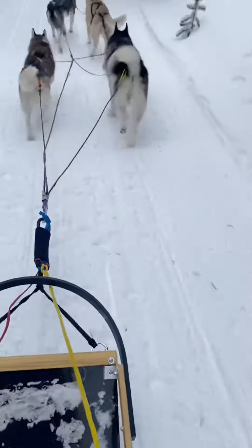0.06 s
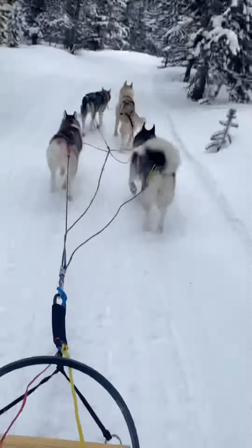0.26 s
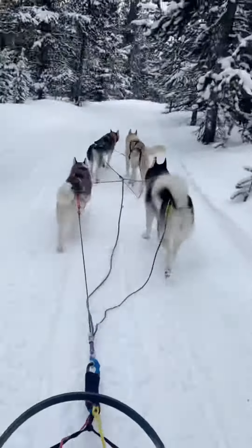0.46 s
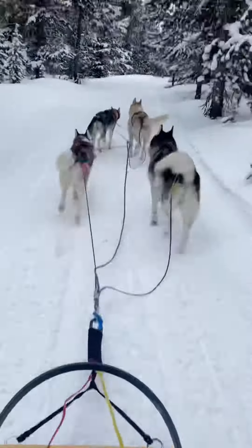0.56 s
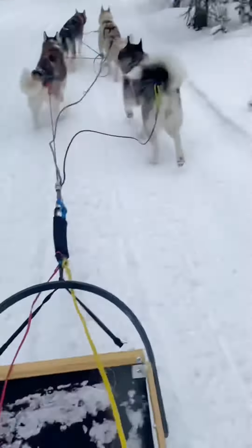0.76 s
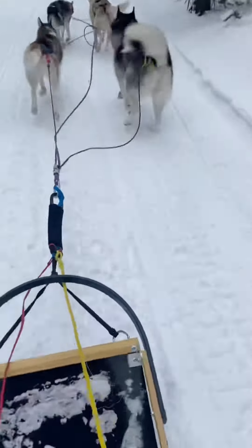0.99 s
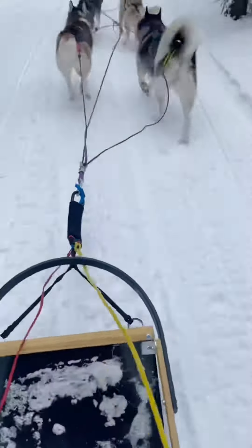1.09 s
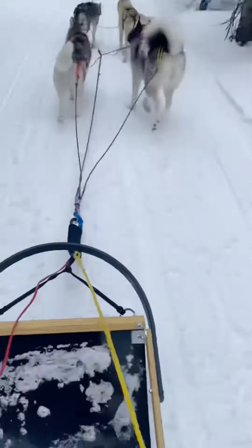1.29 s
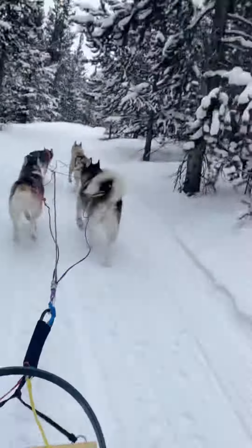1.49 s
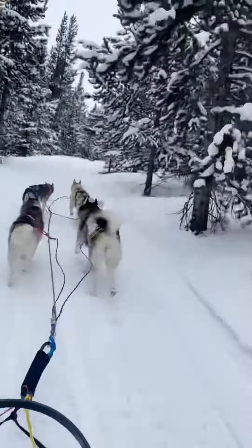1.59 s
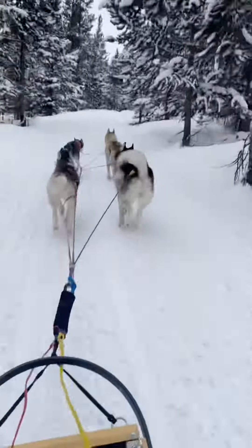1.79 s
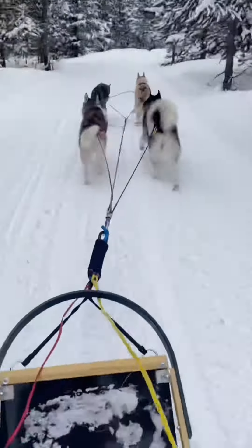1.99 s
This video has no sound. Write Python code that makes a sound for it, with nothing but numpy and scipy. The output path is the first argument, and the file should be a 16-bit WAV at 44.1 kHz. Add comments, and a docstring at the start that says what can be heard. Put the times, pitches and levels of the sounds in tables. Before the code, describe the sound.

A wooden dog sled runs over packed snow, heard close from the handlebar outdoors. Runners hiss and scrape throughout with fine crunching grit. Dull hollow knocks cluster at 0.2-0.6 s, ease briefly, then grow into the heaviest clatter at 0.9-1.3 s. Afterwards the glide is smoother, with a soft knock near 1.6 s and faint squeaks. Small hard ticks and low wind buffets continue throughout.

```python
"""Dog sled on packed snow

A wooden sled glides past lumps and grit, heard at two microphone ports on the handlebar.
Lumps and knocks ring the hollow frame, and breaking grains of crust ring its upper modes.
Shaped noise makes the hiss of the runners; short dying sines make the ticks of a hard fitting.
Noise in a narrow band gives faint squeaks, and deep noise with low buffets gives the wind."""
import sys
import numpy as np
from scipy import signal
from scipy.fft import rfft, irfft
from scipy.io import wavfile
from scipy.ndimage import uniform_filter1d

SR = 44100
rng = np.random.default_rng(int(sys.argv[2]) if len(sys.argv) > 2 else 0)


def materialize(psi):
    """Save the field psi as 16-bit PCM at rate SR to the path in sys.argv[1].

    A 1-D psi becomes a single channel; in a 2-D psi each row is a channel.
    """
    bounded = np.clip(np.atleast_2d(psi).T, -1, 1)
    quanta = np.round(bounded * 32767).astype(np.int16)
    wavfile.write(sys.argv[1], SR, quanta)


N = 90404  # length in samples


def gain_of(db):
    """Turns decibels into a gain."""
    return 10 ** (np.asarray(db) / 20)


def evened(x):
    """Scales a signal to an rms of 1."""
    return x / np.sqrt(np.mean(np.abs(x) ** 2) + 1e-20)


def read(points, hz):
    """Reads a table between its points, on a log-frequency axis."""
    f, value = np.transpose(points)
    return np.interp(np.log(hz + 1), np.log(f + 1), value)


def add(mix, s, sound):
    """Mixes in a sound at a time in seconds."""
    part = mix[round(s * SR):][:len(sound)]
    part += sound[:len(part)]


def ports(total, difference):
    """Makes left and right from their sum and difference."""
    return np.array([total + difference, total - difference])


def sparse(per_s, spread_db):
    """Random clicks of either sign, a few of them large."""
    sign = rng.choice([-1., 1.], N)
    size = gain_of(spread_db * np.minimum(rng.exponential(1, N), 4))
    return sign * size * (rng.random(N) < per_s / SR)


def ring(modes, spread=0.):
    """A struck object rings as a sum of dying sines, scaled to peak 1; spread detunes them."""
    t = np.arange(8192) / SR
    out = np.zeros(len(t))
    for hz, db, t60 in modes:
        fade = gain_of(db - 60 * t / max(t60, .001))
        detuned = hz * (1 + spread * rng.standard_normal())
        out += fade * np.sin(2 * np.pi * detuned * t)
    return out / abs(out).max()


def blow(hz, cycles, body):
    """A short push of a few cycles rings a body; peak 1."""
    t = np.arange(0, max(cycles, .5) / hz, 1 / SR)
    push = np.sin(np.pi * t / t[-1]) * np.sin(2 * np.pi * hz * t)
    sound = signal.oaconvolve(push, body)
    return sound / abs(sound).max()


# roughness of the trail: (t/s, frame shaking level/dB, high hiss level/dB, low scrape level/dB);
# levels are relative
TRAIL_ROUGHNESS = [(0, -45, -60, -47.5), (.18, -41.5, -61, -49.5), (.25, -33.5, -62.5, -50),
                   (.33, -35.5, -60, -52), (.45, -34.5, -60, -48.5), (0.52, -32.5, -61, -45),
                   (.59, -34.5, -63.5, -48), (.65, -49, -58, -49), (.9, -40.5, -60, -48),
                   (1.0, -32, -58, -50), (1.119, -27, -56.5, -43), (1.24, -31, -54.5, -45),
                   (1.33, -33.5, -57, -49.5), (1.41, -41, -63.5, -48.5), (1.57, -45, -63.5, -49),
                   (1.64, -41.5, -59, -43.5), (1.8, -39, -60, -48), (2.05, -43, -62.5, -47.5)]


def trail(column):
    """How strongly the trail drives one kind of sound, as a gain for every sample."""
    table = np.array(TRAIL_ROUGHNESS)
    return gain_of(np.interp(np.arange(N) / SR, table[:, 0], table[:, column]))


# ringing modes of the hollow frame: (f/Hz, relative level/dB, time to fade by 60 dB: t60/s)
FRAME_MODES = [(198.8, 8, 0.067), (273, 6, 0.071), (321.4, 6, 0.077), (356, 5.5, 0.099), (433, 1.5, 0.02),
               (641, -7.5, 0.052), (1098, -14, 0.023), (1494, -21.5, 0.018), (2026, -22, 0.031),
               (2304, -32, 0.023)]
LUMPS_PER_S, LUMP_SPREAD_DB, LUMP_SPOTS = 1200, 2, 4


def shaking():
    """Many small lumps ring the frame at several slightly different spots; rms 1."""
    total = np.zeros(N)
    for _ in range(LUMP_SPOTS):
        lumps = sparse(LUMPS_PER_S / LUMP_SPOTS, LUMP_SPREAD_DB)
        total += signal.oaconvolve(lumps, ring(FRAME_MODES, 0.0083))[:N]
    return evened(total)


# knocks on the frame: (t/s, peak level/dB before the band filter, f/Hz of the blow, blow length/cycles)
FRAME_KNOCKS = [(0.013, -28.5, 314, 1.05), (0.148, -28.5, 339, 4.7), (0.23, -22, 294, 3.04),
                (0.252, -22.5, 340, 1.6), (0.314, -27, 265, 1.7), (0.349, -22.5, 366, 2.2),
                (0.405, -20, 303, 2.36), (0.496, -21.5, 258, 4.9), (0.519, -22.5, 215, 2.2),
                (0.533, -27, 228, 1.4), (0.56, -28.5, 163, 5.2), (0.781, -18, 362, 1.68),
                (0.937, -15.5, 284.6, 5.3), (0.956, -19.5, 308, 1.34), (1.007, -20.5, 307, 0.83),
                (1.018, -20, 278, 2.8), (1.054, -16.5, 317, 2.1), (1.084, -16.5, 245, 1.74),
                (1.103, -11, 280, 2.54), (1.128, -16, 260, 3.9), (1.15, -24, 267, 8.4),
                (1.18, -15, 327, 4.6), (1.196, -11.5, 368, 2.24), (1.23, -20.5, 200, 1.6),
                (1.296, -20, 249, 3.1), (1.317, -30, 242, 3.4), (1.613, -27, 333, 3)]
# sharper raps that wake the upper modes: (t/s, peak level/dB before the band filter, f/Hz of the blow)
SHARP_RAPS = [(0.222, -37.5, 1440), (.353, -29, 710), (.4, -31, 700), (0.503, -37.5, 1160),
              (0.573, -25, 700), (1.031, -33, 1050), (.94, -38, 1110), (1.104, -29, 1420),
              (1.188, -29, 1120), (1.228, -33.5, 1130), (1.985, -30.5, 690)]
RAP_CYCLES = 2.47


def knocks():
    """Larger lumps knock the frame; sharper raps bring out its upper modes."""
    sound, body = np.zeros(N), ring(FRAME_MODES)
    bright_body = np.diff(body, n=2)  # differencing lifts the upper modes
    for s, db, hz, cycles in FRAME_KNOCKS:
        add(sound, s, gain_of(db) * blow(hz, cycles, body))
    for s, db, hz in SHARP_RAPS:
        add(sound, s, gain_of(db) * blow(hz, RAP_CYCLES, bright_body))
    return sound


FRAME_LOW_HZ, LUMP_TOP_HZ = 142, 2760
FRAME_PAN_DB, FRAME_WIDE_DB = -1.5, -21.5  # left against right; level of the difference


def frame():
    """The hollow frame shakes and knocks in a middle band, with a little width between the ports."""
    band = signal.butter(2, [FRAME_LOW_HZ, LUMP_TOP_HZ], "band", fs=SR, output="sos")
    roughness = trail(column=1)
    near = signal.sosfilt(band, roughness * shaking() + knocks())
    wide = gain_of(FRAME_WIDE_DB) * signal.sosfilt(band, roughness * shaking())
    return near * gain_of([[FRAME_PAN_DB / 2], [-FRAME_PAN_DB / 2]]) + ports(0, wide)


GRIT_PER_S, GRIT_SPREAD_DB, CLUMP_DB, GRIT_TOP_HZ = 700, 4, 3.5, 3500
GRIT_DB, GRIT_WIDE_DB = -17, -1.5  # overall; difference against sum


def grit():
    """Grains of crust break under the runners in clumps and ring the upper modes of the frame."""
    clumps = gain_of(CLUMP_DB * evened(uniform_filter1d(rng.standard_normal(N), size=600)))

    def grains():
        clicks = clumps * sparse(GRIT_PER_S, GRIT_SPREAD_DB)
        upper_modes = np.diff(ring(FRAME_MODES[5:], 0.044))
        return trail(column=1) * evened(signal.oaconvolve(clicks, upper_modes)[:N])

    both = ports(grains(), gain_of(GRIT_WIDE_DB) * grains())
    soft = signal.butter(4, GRIT_TOP_HZ, fs=SR, output="sos")
    return gain_of(GRIT_DB) * signal.sosfilt(soft, both)


# hiss in the sum and in the difference of the ports; each has deep gaps in the treble:
# (f/Hz, relative level/dB per Hz)
SUM_SPECTRUM = [(100, -34), (340, -10), (520, -19), (680, -19), (1000, -29), (3000, -29), (5300, -23),
                (6400, -28), (6900, -41), (7100, -104), (7700, -42), (8200, -31.5), (8700, -28),
                (10400, -26), (12000, -33), (12500, -88)]
DIFFERENCE_SPECTRUM = [(100, -15), (300, -18.5), (1090, -21.5), (1800, -36.5), (2700, -21), (5230, -22),
                       (7800, -13), (9500, -22.5), (9900, -79), (11400, -66), (11900, -25.5), (14000, -29),
                       (15200, -51)]
# how far the difference follows the sum: (f/Hz, share from 0 to 1)
PORT_LINK = [(100, 0.41), (1000, 0.66), (2500, 0.6), (5000, 0.99), (15000, 0.98)]
DIFFERENCE_DB, HISS_DB = -8.5, 9.5
PATCHY_DB, FLICKER_DB, SCRAPE_TOP_HZ = 1.3, 1.0, 2770


def hiss():
    """Snow crystals shear under the runners: patchy, flickering noise at both ports."""
    step, size = 128, 512  # samples between and in the short spectra
    frames, hz = N // step + 5, np.fft.rfftfreq(size, 1 / SR)
    a, b, c, d, patches = rng.standard_normal((frames, len(hz), 5)).T
    common, separate = a + 1j * b, c + 1j * d
    linked = np.clip(read(PORT_LINK, hz), 0, 1)[:, None]
    # 1j turns the shared part by a quarter cycle
    apart = 1j * linked * common + np.sqrt(1 - linked ** 2) * separate
    total = common * gain_of(read(SUM_SPECTRUM, hz))[:, None]
    difference = apart * gain_of(read(DIFFERENCE_SPECTRUM, hz) + DIFFERENCE_DB)[:, None]
    z = np.array([total, difference])
    loudness = np.sqrt(np.sum(abs(total[hz > 1500]) ** 2))

    patches = uniform_filter1d(patches, size=8, axis=0)  # smooth over frequency
    patches = evened(uniform_filter1d(patches, size=14, axis=1))  # then over time
    flicker = evened(uniform_filter1d(rng.standard_normal(frames), size=8))
    z = z * gain_of(PATCHY_DB * patches + FLICKER_DB * flicker) / loudness

    # the trail sets the low scrape and the high hiss separately
    low = 1 / (1 + (hz[:, None] / SCRAPE_TOP_HZ) ** 4)
    at = np.clip(np.arange(frames) * step, 0, N - 1)
    z = z * (low * trail(column=3)[at] + (1 - low) * trail(column=2)[at]) * gain_of(HISS_DB)
    waves = signal.istft(z, nperseg=size, noverlap=size - step)[1][:, :N]
    return ports(*waves * np.sqrt(frames))


# main hits of the ticking fitting: (t/s, level/dB before ringing and filtering)
TICK_HITS = [(0.247, -29), (0.2558, -29.5), (0.4408, -26.5), (0.5036, -31.5), (0.6, -40), (0.631, -31),
             (0.6545, -23.5), (.6875, -34), (0.81, -28.5), (1.0025, -24), (1.053, -26.5), (1.1037, -30),
             (1.2165, -31), (1.407, -28.5), (1.5147, -36), (1.5962, -31), (1.6059, -24), (1.717, -35),
             (1.7417, -28), (1.7749, -32), (1.933, -32)]
# ringing modes of the small hard fitting: (f/Hz, relative level/dB, time to fade by 60 dB: t60/s)
FITTING_MODES = [(1290, -14, 0.002), (2380, 7, 0.0039), (3500, 23.5, 0.0017), (4670, 25.5, 0.0052),
                 (5560, -13, 0.006)]
RATTLE_S, RATTLE_DB, TICK_SPREAD = .012, -11, .04
REBOUND_S, REBOUND_DB = .0023, -7
TICK_TOP_HZ, TICK_PAN_DB, TICK_LEAD_S = 6200, 3.5, .00003


def ticks():
    """A hard fitting ticks, rebounds once and rattles a little around each hit."""
    sound = np.zeros(N)
    for at, db in TICK_HITS:
        hits, s = np.zeros(1024), RATTLE_S * .3  # room for rattle before the main hit
        add(hits, s, np.array([gain_of(db)]))
        for when, size in rng.random((4, 2)):
            add(hits, s + RATTLE_S * (when - .3), gain_of([db + RATTLE_DB]) * (2 * size - 1))
        add(hits, s + REBOUND_S, -np.array([gain_of(db + REBOUND_DB)]))
        add(sound, at - s, signal.oaconvolve(hits, ring(FITTING_MODES, TICK_SPREAD)[:1024]))
    sound = signal.sosfilt(signal.butter(10, TICK_TOP_HZ, fs=SR, output="sos"), sound)
    # the left port is slightly later, and louder
    late = np.interp(np.arange(N) - TICK_LEAD_S * SR, np.arange(N), sound)
    return np.array([late, sound]) * gain_of([[TICK_PAN_DB / 2], [-TICK_PAN_DB / 2]])


# a runner squeaks faintly on cold snow: (start t/s, length t/s, level/dB before the swell, starting f/Hz)
RUNNER_SQUEAKS = [(.01, 0.18, -58, 1720), (1.436, 0.031, -48.5, 1727), (1.605, 0.1, -53.5, 1565),
                  (1.694, 0.12, -53, 1654), (1.869, 0.057, -53.5, 1590)]
SQUEAK_WIDTH_HZ, SQUEAK_RISE_HZ = 135, 70


def squeaks():
    """Noise in a narrow, rising resonance swells and fades."""
    out = np.zeros(N)
    r = np.exp(-np.pi * SQUEAK_WIDTH_HZ / SR)
    for start, length, db, hz in RUNNER_SQUEAKS:
        t = np.arange(0, length, 1 / SR)
        noise = rng.standard_normal(8192) + 1j * rng.standard_normal(8192)
        slow = signal.lfilter([1], [1, -2 * r, r * r], noise)[-len(t):]
        cycles = np.cumsum(hz + SQUEAK_RISE_HZ * t / length) / SR
        # move the slow noise up to the squeak's pitch
        tone = evened((slow * np.exp(2j * np.pi * cycles)).real)
        swell = np.sqrt(np.sin(np.pi * t / length))
        add(out, start, gain_of(db) * swell * tone)
    return out


# spectrum of the wind rumble: (f/Hz, relative level/dB per Hz)
WIND_SPECTRUM = [(15, -12), (28, -7.5), (58, -8), (85, -12), (130, -32), (300, -50), (900, -110)]
# low buffets of wind: (t/s, peak level/dB)
WIND_BUFFETS = [(.075, -36), (0.265, -31.5), (0.353, -32), (.415, -34.5), (.616, -34.5), (.817, -39),
                (0.932, -35), (1.06, -34), (1.139, -31), (1.275, -31), (1.425, -32), (1.499, -35.5),
                (1.615, -36), (1.723, -34.5), (1.845, -30.5)]
BUFFET_HZ, BUFFET_S = 54.6, 0.057
WIND_DB, GUST_DB, WIND_APART_DB = -44.5, 1.5, -10


def wind():
    """A light wind gives a low, lumpy rumble, nearly the same at both ports."""
    hz = np.fft.rfftfreq(N, 1 / SR)
    noise = irfft(rfft(rng.standard_normal((2, N))) * gain_of(read(WIND_SPECTRUM, hz)), N)
    slow = (hz < 9) * (hz > 0)
    gusts = evened(irfft(rfft(rng.standard_normal(N)) * slow, N))
    rumble = gain_of(WIND_DB) * evened(noise * gain_of(GUST_DB * gusts))
    t = np.arange(0, BUFFET_S, 1 / SR)
    for s, db in WIND_BUFFETS:
        wave = np.sin(2 * np.pi * (BUFFET_HZ * t + rng.random()))
        add(rumble[0], s, gain_of(db) * np.sin(np.pi * t / BUFFET_S) * wave)
    return ports(rumble[0], gain_of(WIND_APART_DB) * rumble[1])


def scene():
    """Adds all the sources at the two ports."""
    return frame() + grit() + hiss() + ticks() + squeaks() + wind()


LOW_CUT_HZ, EDGE_HZ = 28, 15600


def record(dry):
    """The microphone drops the deepest bass; then a steep filter removes the highest treble."""
    cut = signal.sosfilt(signal.butter(2, LOW_CUT_HZ, "high", fs=SR, output="sos"), dry)
    band_limit = signal.firwin(511, EDGE_HZ, window=("kaiser", 9), fs=SR)
    return signal.oaconvolve(cut, band_limit[None], "same")


dry = scene()
out = record(dry)
materialize(out)
```